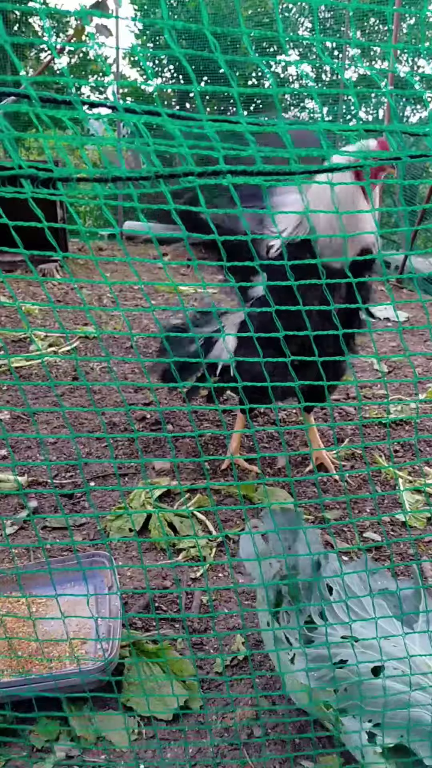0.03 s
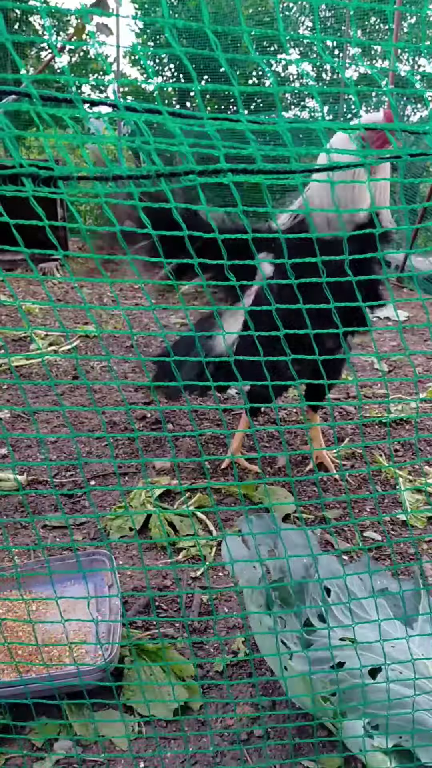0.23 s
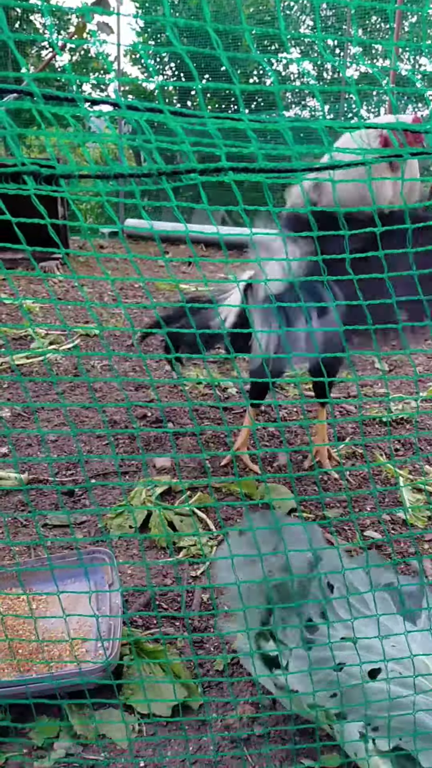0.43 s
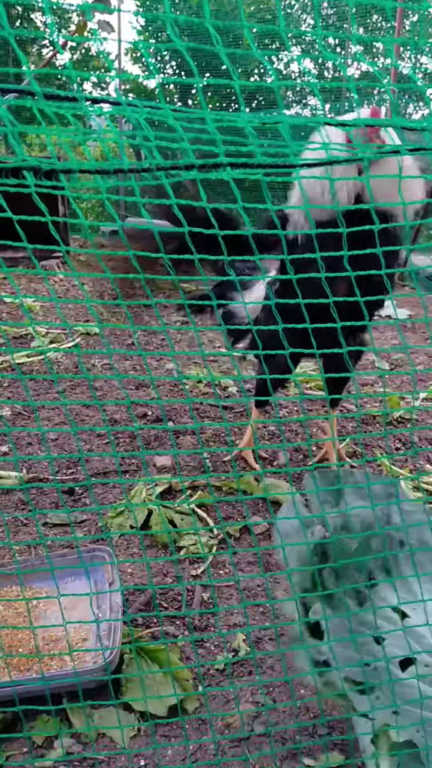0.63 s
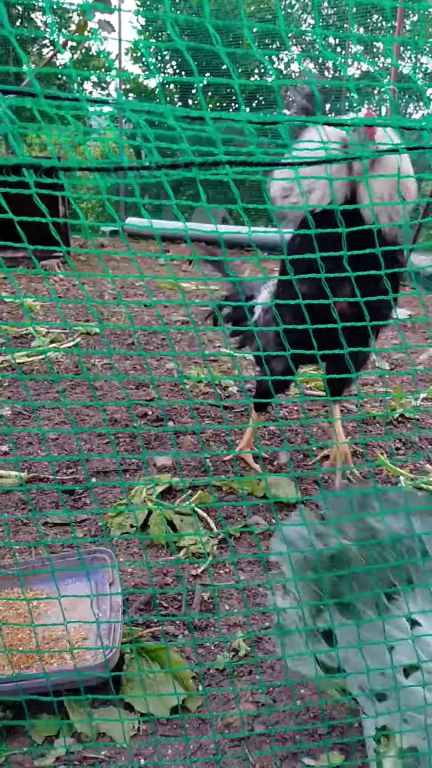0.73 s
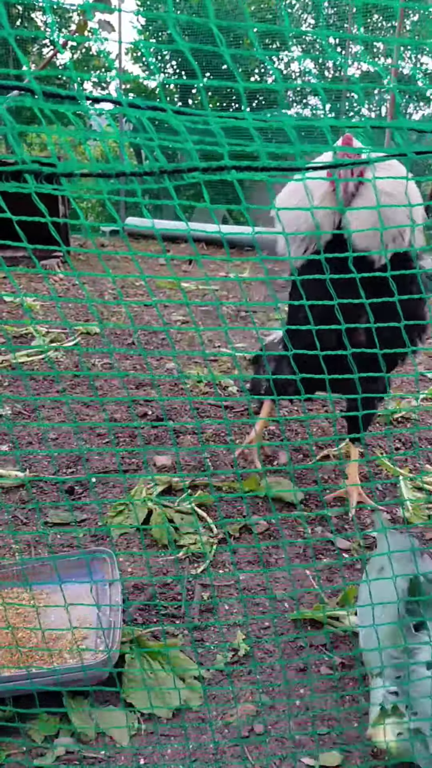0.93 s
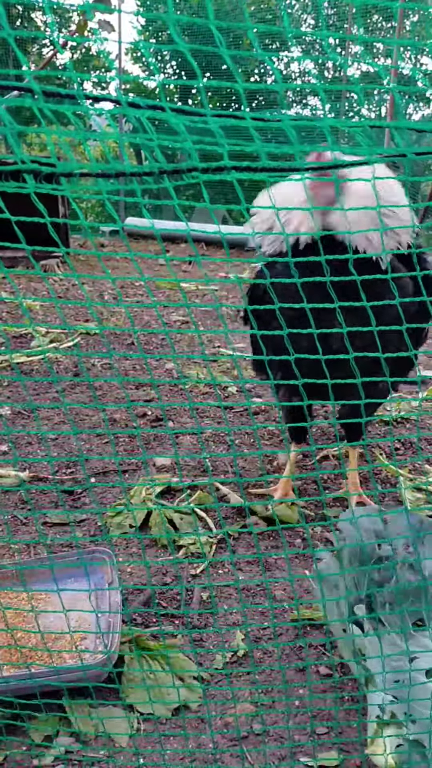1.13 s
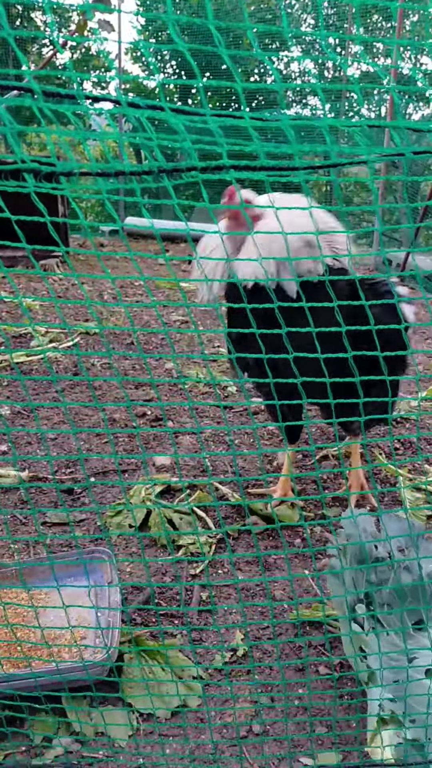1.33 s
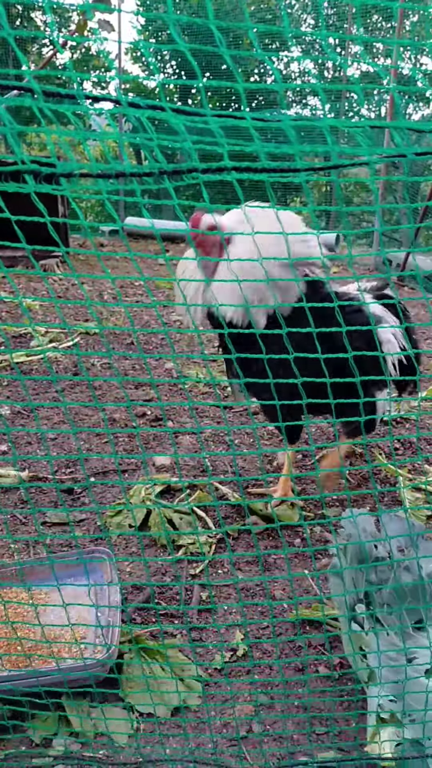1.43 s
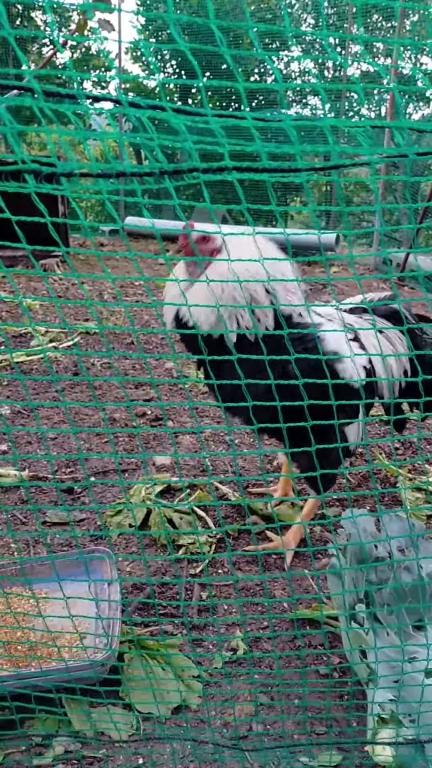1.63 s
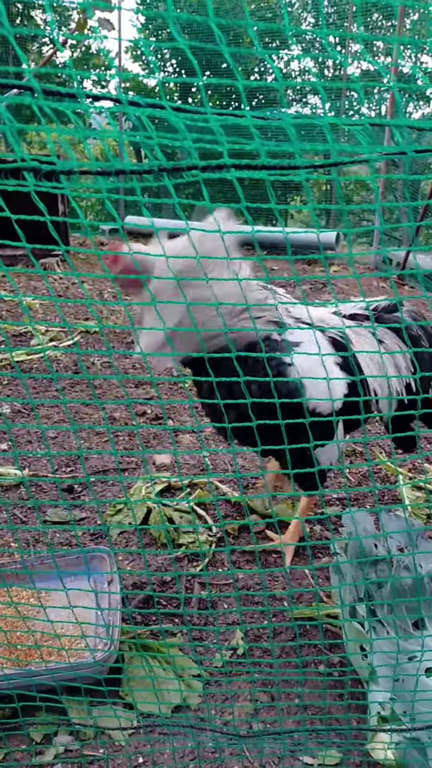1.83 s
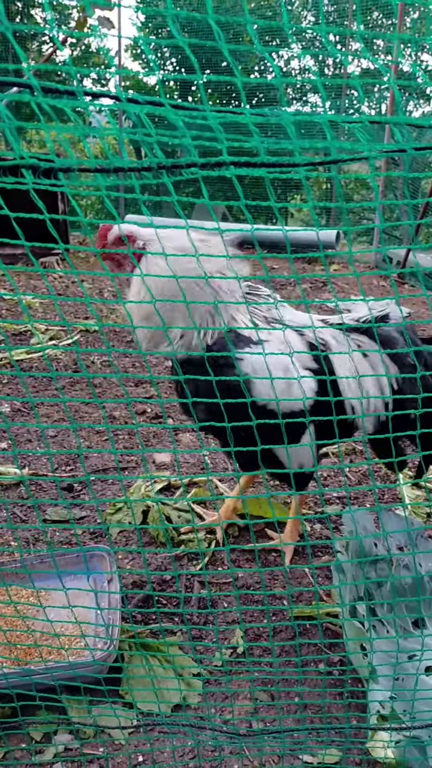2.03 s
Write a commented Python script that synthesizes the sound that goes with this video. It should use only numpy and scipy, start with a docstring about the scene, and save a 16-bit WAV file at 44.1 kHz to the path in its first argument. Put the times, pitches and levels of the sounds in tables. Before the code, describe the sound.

Rooster wings beat six times outdoors, whooshing and snapping, before faint birds chirp.

```python
"""In a garden run, close to the microphone, a rooster beats its wings six times, then folds them.
Each stroke sheds turbulence, heard as a whoosh with hissing feathers; in the harder strokes the
loaded wing flutters. Stiff feathers snap against each other, the plumage rustles by friction, and
the draught buffets the microphone. Small birds call in the quiet afterwards."""
import sys
import numpy as np
from scipy import signal
from scipy.fft import rfft, irfft
from scipy.io import wavfile

SR = 44100
rng = np.random.default_rng(int(sys.argv[2]) if len(sys.argv) > 2 else 0)


def bounce(signal):
    """Save signal as a 16-bit WAV file at the path given by the first command-line argument."""
    frames = np.transpose(np.atleast_2d(signal))
    limited = np.clip(frames, -1, 1)
    pcm = np.round(limited * 32767).astype(np.int16)
    wavfile.write(sys.argv[1], SR, pcm)


N = 92610
T = np.arange(N) / SR


# Downstrokes: peak_s, rise_s, fall_s, whoosh_db, hiss_db
DOWNSTROKES = [(.19, 0.061, 0.037, -55.5, -53), (0.373, 0.031, 0.085, -47.5, -45),
               (0.528, 0.014, 0.016, -38.5, -37), (0.654, 0.012, 0.012, -27.5, -28),
               (.768, .008, 0.011, -31.5, -33), (0.907, 0.035, 0.014, -44.5, -43)]
# Spectra of the flow round the wing and through the feathers: frequency_hz, gain_db
WHOOSH_SPECTRUM = [(40, -10.5), (130, -1), (250, -4), (450, -1.5), (730, -0.5), (1300, -10.5), (1800, -7),
                   (2700, -15.5), (5000, -24.5), (9000, -42)]
HISS_SPECTRUM = [(60, -47), (250, 4.5), (600, -11), (1100, -14), (2700, -8), (3800, 2.5), (4500, 2.5),
                 (5200, 8), (6400, 1.5), (7600, -13), (9000, -21.5)]
def wingbeats():
    """Turbulence: air forced round the wing and through its feathers radiates broadband noise."""
    whoosh_level = power_sum(swell(s, rise, fall, db) for s, rise, fall, db, _ in DOWNSTROKES)
    hiss_level = power_sum(swell(s, rise, fall, db) for s, rise, fall, _, db in DOWNSTROKES)
    whoosh = colour(whoosh_level * rng.standard_normal(N), WHOOSH_SPECTRUM)
    hiss = colour(hiss_level * grains(per_s=5000, spread_db=1), HISS_SPECTRUM)
    return whoosh + hiss


# Bursts of vane vibration: peak_s, width_s, pitch_hz, level_db
VANE_FLUTTERS = [(.361, .012, 290, -46.5), (.518, 0.0036, 300, -27.5), (0.654, 0.0045, 260, -22),
                 (0.769, 0.0038, 310, -27), (0.908, 0.0062, 320, -39)]
def wing_flutter(overtone_db=-19):
    """Aeroelastic flutter: a loaded vane oscillates for a few cycles, giving a low thump."""
    thumps = np.zeros(N)
    for peak_s, width_s, pitch_hz, level_db in VANE_FLUTTERS:
        phase = 2 * np.pi * pitch_hz * (T - peak_s)
        wave = np.cos(phase) + amp(overtone_db) * (np.cos(2 * phase) + np.cos(3 * phase))
        envelope = np.exp(-.5 * ((T - peak_s) / width_s) ** 2)
        thumps += amp(level_db) * unit_rms(wave) * envelope
    return thumps


# Feather impacts: start_s, crack_db, slap_db
FEATHER_IMPACTS = [(0.1931, -32.5, -36.5), (.1955, -32.5, -42), (0.3662, -42, -37.5), (.3824, -24, -35.5),
                   (0.384, -29.5, -38.5), (.6182, -29, -50), (0.6644, -25.5, -33), (0.7639, -44, -31),
                   (0.7812, -43, -44), (0.9093, -38.5, -29.5), (0.912, -35.5, -50), (1.032, -41.5, -55),
                   (1.0939, -42.5, -51), (1.0966, -40, -29.5), (1.102, -42, -42), (1.108, -41, -73),
                   (1.434, -53, -81.5)]
# Spectra of the quill's crack and the vane's slap: frequency_hz, gain_db
CRACK_SPECTRUM = [(200, -30), (1500, -1), (2800, -21.5), (3600, -2), (4500, -5.5), (5000, 7.5), (5450, 5),
                  (5900, 0), (6600, -7.5), (7300, -4.5), (9000, -43.5)]
SLAP_SPECTRUM = [(60, -19.5), (160, 1), (450, -10.5), (730, -3), (900, -8), (1110, 3), (1400, -15.5),
                 (1750, -7.5), (2400, -11.5), (3500, -12.5), (9000, -37)]
def feather_snaps(crack_s=0.0019, slap_s=0.00078, shiver_s=0.012, knock_s=0.003, knock_hz=1130):
    """Impact and damped vibration: a quill cracks, and the vane slaps the body with a hollow knock."""
    crack_power, slap_power, knock = np.zeros((3, N))
    for start_s, crack_db, slap_db in FEATHER_IMPACTS:
        started = T >= start_s
        age = np.maximum(T - start_s, 0)
        shiver = amp(-10) * np.exp(-age / shiver_s)  # nearby feathers shake briefly
        crack_power += started * (amp(crack_db) * (np.exp(-age / crack_s) + shiver)) ** 2
        slap_power += started * (amp(slap_db) * (np.exp(-age / slap_s) + shiver)) ** 2
        knock += amp(slap_db - 3) * np.exp(-age / knock_s) * np.sin(2 * np.pi * knock_hz * age)
    crack_noise, slap_noise = rng.choice([-1., 1.], (2, N))
    crack = colour(np.sqrt(crack_power) * crack_noise, CRACK_SPECTRUM)
    slap = colour(np.sqrt(slap_power) * slap_noise, SLAP_SPECTRUM)
    return crack + slap + knock


# Plumage sliding as the wings lift and settle: peak_s, rise_s, fall_s, level_db
PLUMAGE_SLIDES = [(.005, 0.027, 0.094, -55.5), (.115, 0.0048, 0.043, -52.5), (.23, 0.036, 0.073, -52),
                  (0.421, 0.019, 0.047, -54), (0.501, 0.0066, 0.021, -42), (.572, 0.042, 0.055, -39.5),
                  (.624, 0.0048, 0.0083, -26), (0.701, 0.015, 0.02, -35), (0.744, 0.006, 0.014, -39),
                  (0.816, 0.032, 0.027, -42.5), (0.938, .015, 0.042, -48), (1.029, 0.04, 0.061, -50),
                  (1.218, 0.12, 0.11, -58.5), (1.73, 0.027, 0.027, -65.5), (1.989, 0.05, 0.13, -65.5),
                  (2.074, 0.02, 0.016, -56.5)]
# Spectrum of rubbing feathers: frequency_hz, gain_db
RUSTLE_SPECTRUM = [(50, -24), (130, 3), (260, 0.5), (500, -1.5), (1100, -1), (1900, -6), (2700, -6.5),
                   (3800, -1.5), (4500, 2.5), (5200, 5.5), (6400, -4), (7600, -9), (9000, -37)]
def plumage_rustle():
    """Friction: the barbs of sliding feathers catch on each other in dense, tiny clicks."""
    level = power_sum(swell(*slide) for slide in PLUMAGE_SLIDES)
    return colour(level * grains(per_s=4000, spread_db=1.5), RUSTLE_SPECTRUM)


# Strength of the draught: time_s, level_db
DRAUGHT_LEVEL = [(0, -48), (.08, -51.5), (.155, -43), (.22, -47.5), (.29, -43), (.35, -47), (.41, -42.5),
                 (.49, -34), (.57, -32), (.66, -29.5), (.77, -33), (.88, -44), (.96, -38), (1.01, -35),
                 (1.09, -34), (1.17, -52), (1.32, -65.5), (2.1, -74)]
# Spectrum of the buffeting: frequency_hz, gain_db
BUFFET_SPECTRUM = [(8, 2.5), (25, -3), (45, -6.5), (80, -22.5), (140, -29), (300, -53.5), (1000, -82.5)]
def draught():
    """Wind noise: air thrown by the wings presses unevenly on the microphone and rumbles."""
    return contour(DRAUGHT_LEVEL) * noise(BUFFET_SPECTRUM)


# Strength of the wake: time_s, level_db
WAKE_LEVEL = [(0, -62.5), (.22, -53.5), (.32, -64), (.345, -43), (.43, -44), (.475, -49), (.53, -42.5),
              (.575, -37.5), (.63, -48.5), (.715, -35), (.745, -41), (.82, -41.5), (.865, -57), (.925, -44),
              (.96, -54.5), (1.1, -70), (1.2, -71), (1.4, -81)]
# Spectrum of the stirred air: frequency_hz, gain_db
WAKE_SPECTRUM = [(30, -12.5), (85, -2), (150, -6), (200, -4), (260, -5), (400, -17.5), (800, -24),
                 (3000, -60.5)]
def wake():
    """Wake turbulence: eddies behind the wings make a soft, low, fluctuating noise."""
    return contour(WAKE_LEVEL) * noise(WAKE_SPECTRUM)


# Spectrum of the yard's reflections: frequency_hz, gain_db
YARD_SPECTRUM = [(60, -30), (300, -8.5), (800, -1.5), (5000, 0.5), (9000, -0.5)]
def yard_reverb(sound):
    """Reverberation: ground and fence return many quickly fading reflections, weak in the bass."""
    return colour(echoes(sound, t60_s=0.25, count=900), YARD_SPECTRUM)


# Course of a small bird's whistle: time_s, pitch_hz, level_db
WHISTLE_COURSE = [(1.69, 5370, -81.5), (1.712, 5214, -55.5), (1.727, 5244, -52), (1.735, 5220, -48),
                  (1.75, 5060, -55), (1.775, 5080, -60), (1.816, 5180, -71.5), (1.87, 5130, -84)]
def bird_whistle():
    """Frequency and amplitude modulation: one thin tone swells and fades as its pitch sags."""
    time_s, pitch_hz, level_db = np.transpose(WHISTLE_COURSE)
    sounding = (T > time_s[0]) & (T < time_s[-1])
    envelope = sounding * amp(np.interp(T, time_s, level_db))
    return envelope * tone(np.interp(T, time_s, pitch_hz))


# Calls of farther birds: start_s, length_s, start_hz, end_hz, level_db
FAR_CHIRPS = [(1.577, 0.014, 1524, 1445, -72.5), (1.89, 0.035, 3080, 3740, -74),
              (1.909, 0.041, 5250, 5480, -70), (1.932, 0.037, 3910, 3640, -68)]
def bird_chirps():
    """Linear frequency sweeps: each faint call is a tone gliding under a half-sine envelope."""
    calls = np.zeros(N)
    for start_s, length_s, start_hz, end_hz, level_db in FAR_CHIRPS:
        progress = np.clip((T - start_s) / length_s, 0, 1)
        pitch_hz = start_hz + (end_hz - start_hz) * progress
        calls += amp(level_db) * np.sin(np.pi * progress) * tone(pitch_hz)
    return calls


# Spectrum of quiet outdoor air: frequency_hz, gain_db
AIR_SPECTRUM = [(15, -2), (35, 5), (60, -5.5), (150, -7.5), (300, -13.5), (600, -18), (1200, -22.5),
                (2400, -25.5), (3800, -21), (5200, -15), (6400, -25), (7600, -27), (9000, -55)]
def outdoor_air():
    """Ambient noise: a steady low rumble with a faint high hiss."""
    return noise(AIR_SPECTRUM)


def amp(db):
    """Decibels as an amplitude ratio."""
    return 10 ** (np.asarray(db) / 20)


def unit_rms(x):
    """Normalisation to rms 1."""
    return x / np.sqrt(np.mean(x ** 2) + 1e-20)


def bin_gains(spectrum):
    """Interpolation in log frequency gives a spectrum's gain at every bin."""
    hz, db = np.transpose(spectrum)
    return amp(np.interp(np.log(np.fft.rfftfreq(N, 1 / SR) + 1), np.log(hz), db))


def colour(x, spectrum):
    """Minimum-phase filtering that keeps the power of white noise."""
    cepstrum = irfft(np.log(unit_rms(bin_gains(spectrum))), N)
    cepstrum[1:N // 2] *= 2  # folding the cepstrum makes the filter causal
    cepstrum[N // 2 + 1:] = 0
    taps = irfft(np.exp(rfft(cepstrum)), N)[:4096]
    return signal.oaconvolve(x, taps)[:N]


def noise(spectrum):
    """Spectral shaping: steady coloured noise, rms 1."""
    return unit_rms(irfft(rfft(rng.standard_normal(N)) * bin_gains(spectrum), N))


def tone(pitch_hz):
    """Phase is the integral of frequency: a gliding sine, rms 1."""
    return np.sqrt(2) * np.sin(2 * np.pi * np.cumsum(pitch_hz) / SR)


def grains(per_s, spread_db):
    """Shot noise: randomly timed clicks of uneven size, rms 1."""
    size = amp(spread_db * np.minimum(rng.exponential(1, N), 3))
    polarity = rng.choice([-1., 1.], N)
    return unit_rms(size * polarity * (rng.random(N) < per_s / SR))


def swell(peak_s, rise_s, fall_s, level_db):
    """Exponential growth to a peak, then exponential decay."""
    return amp(level_db) * np.exp(-np.maximum((peak_s - T) / rise_s, (T - peak_s) / fall_s))


def contour(points):
    """Interpolation in decibels turns timed levels into an amplitude envelope."""
    return amp(np.interp(T, *np.transpose(points)))


def power_sum(envelopes):
    """Incoherent sources add by power."""
    return np.sqrt(sum(envelope ** 2 for envelope in envelopes))


def echoes(x, t60_s, count):
    """Scattering: randomly delayed reflections weaken by 60 dB in t60_s."""
    delays = rng.integers(SR // 200, SR // 2, count)
    taps = np.zeros(N)
    taps[delays] = rng.choice([-1., 1.], count) * amp(-60 * delays / SR / t60_s)
    return signal.fftconvolve(x, taps / np.linalg.norm(taps))[:N]


def scene():
    """Superposition: the rooster, the air it moves, birds, echoes and ambience add in one channel."""
    rooster = wingbeats() + wing_flutter() + plumage_rustle() + feather_snaps()
    yard = amp(-14) * yard_reverb(rooster)
    moving_air = draught() + wake()
    birds = bird_whistle() + bird_chirps()
    tree_echoes = amp(-4) * echoes(birds, t60_s=0.37, count=120)
    return (rooster + yard + moving_air + birds + tree_echoes + amp(-68) * outdoor_air())[None]


def record(dry):
    """Band limiting: a linear-phase low-pass filter removes the highest treble."""
    cutoff_hz = 8200
    taps = signal.firwin(255, cutoff_hz, window=("kaiser", 8), fs=SR)
    return signal.oaconvolve(dry, taps[None], "same")


dry = scene()
out = record(dry)
bounce(out)
```